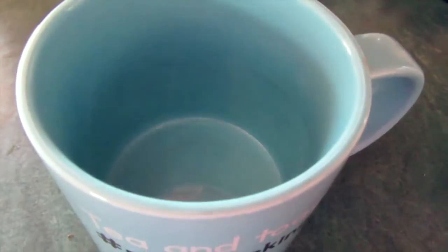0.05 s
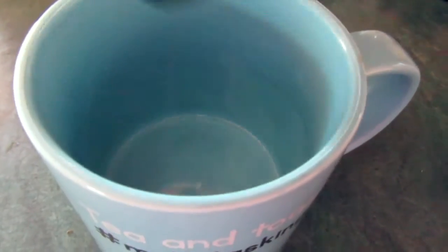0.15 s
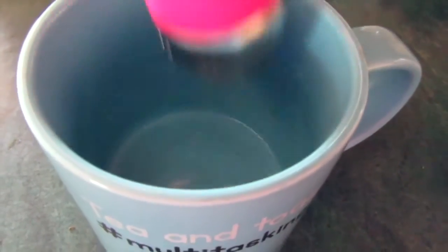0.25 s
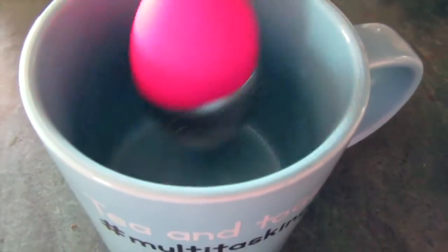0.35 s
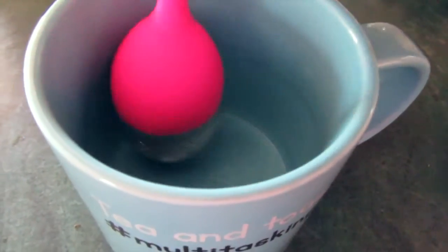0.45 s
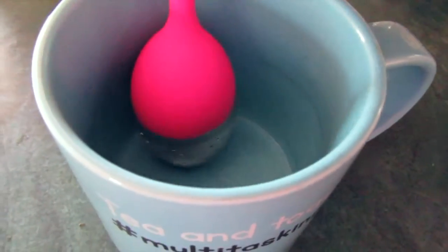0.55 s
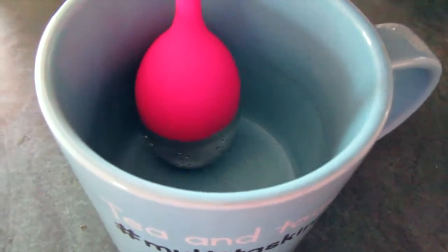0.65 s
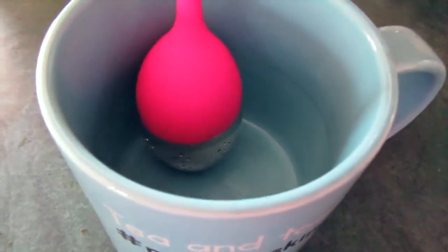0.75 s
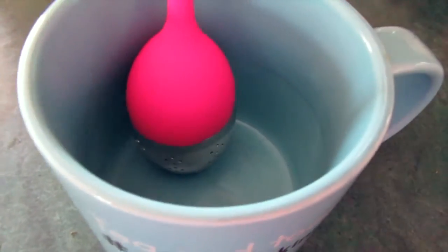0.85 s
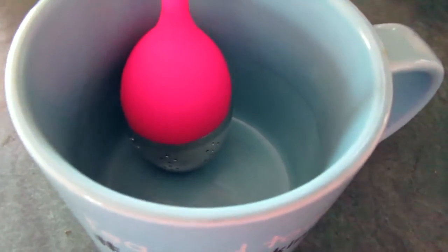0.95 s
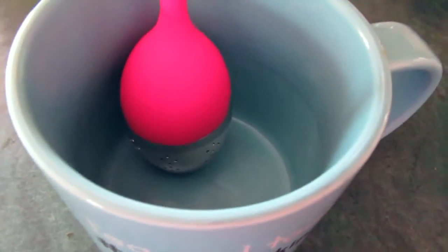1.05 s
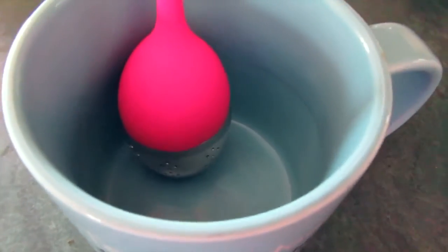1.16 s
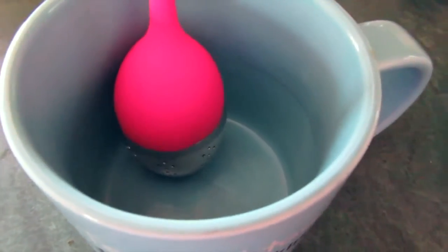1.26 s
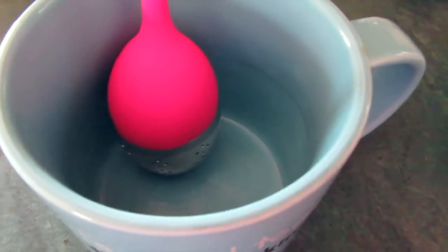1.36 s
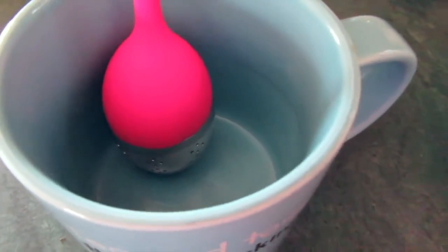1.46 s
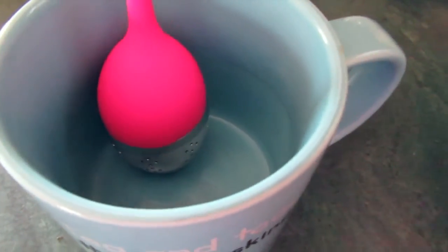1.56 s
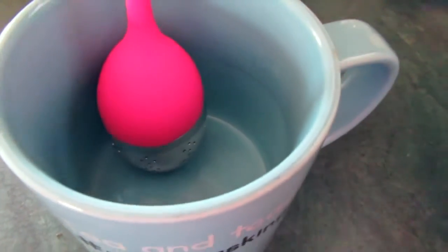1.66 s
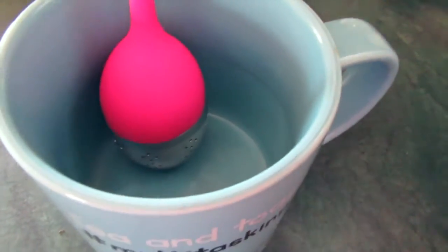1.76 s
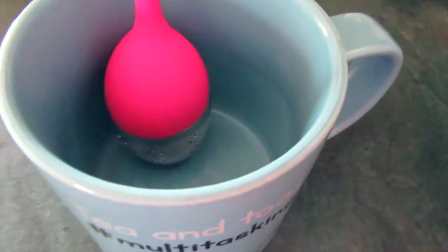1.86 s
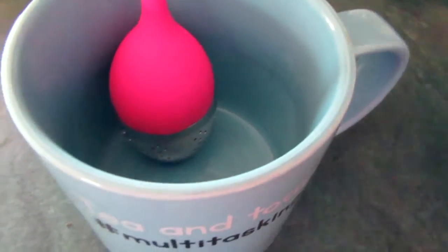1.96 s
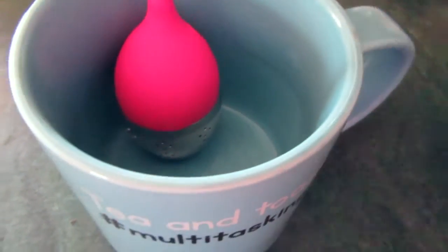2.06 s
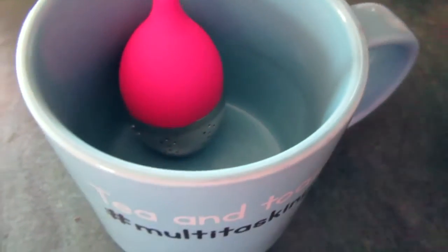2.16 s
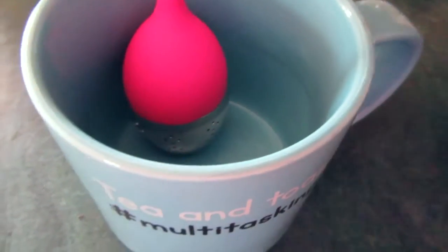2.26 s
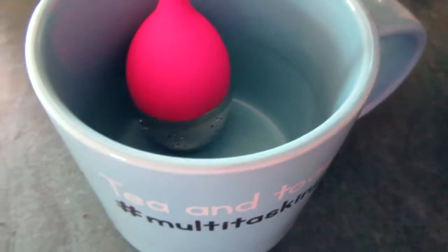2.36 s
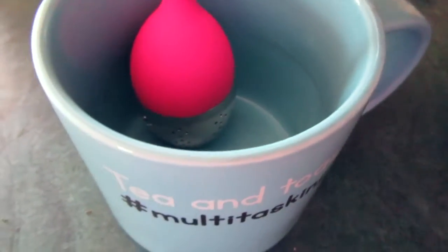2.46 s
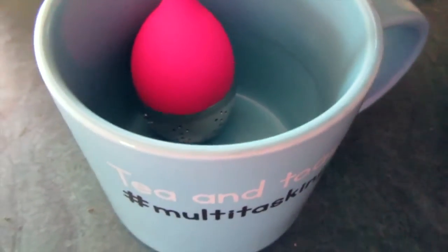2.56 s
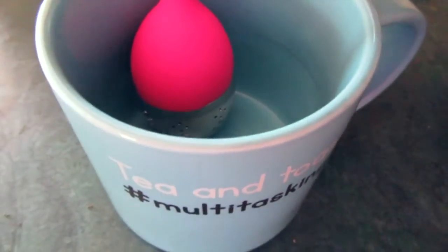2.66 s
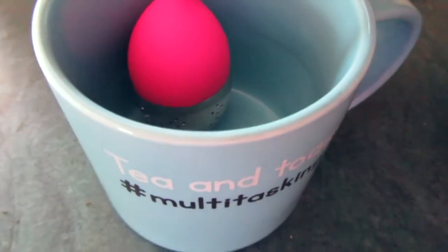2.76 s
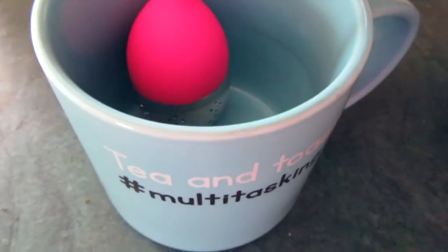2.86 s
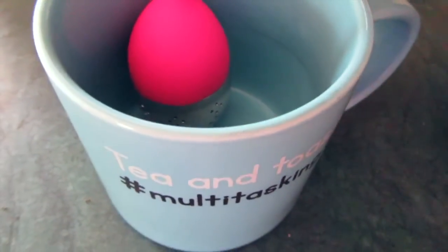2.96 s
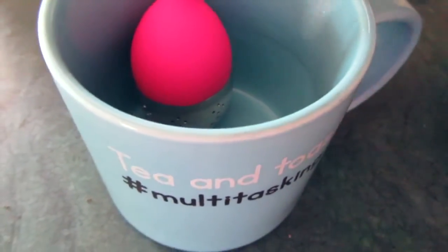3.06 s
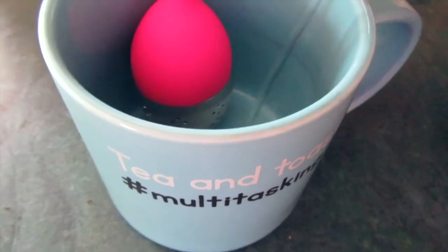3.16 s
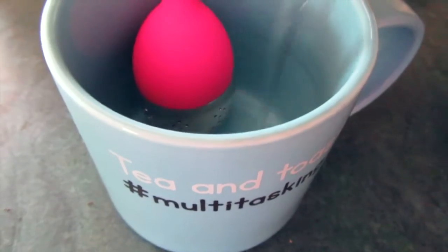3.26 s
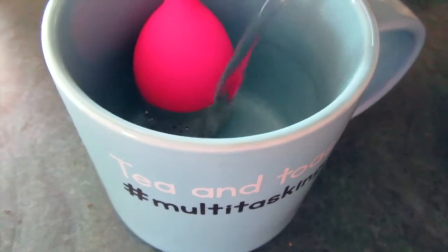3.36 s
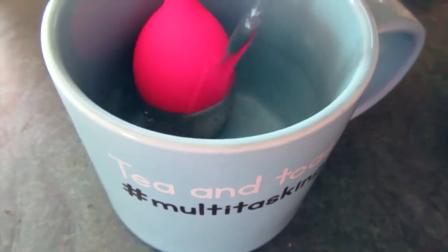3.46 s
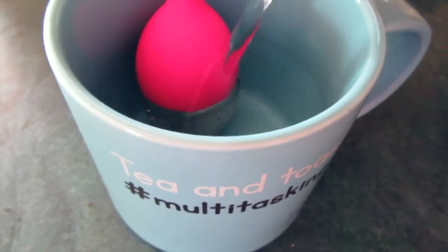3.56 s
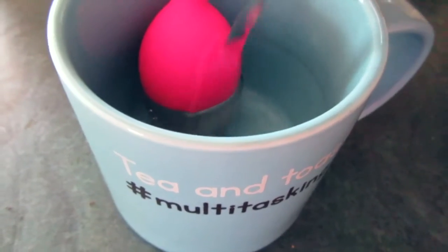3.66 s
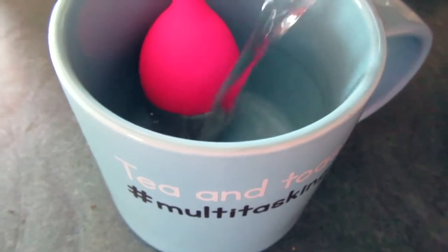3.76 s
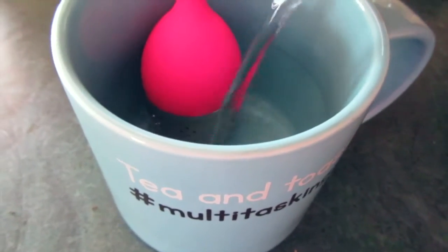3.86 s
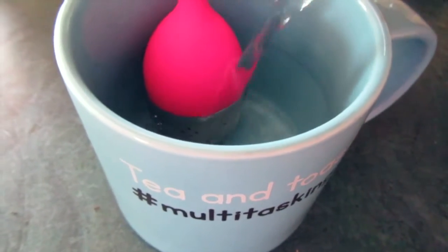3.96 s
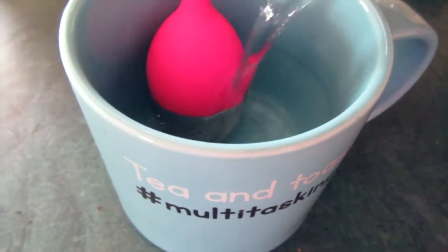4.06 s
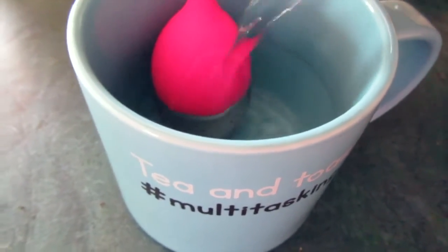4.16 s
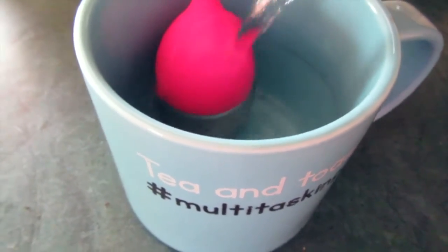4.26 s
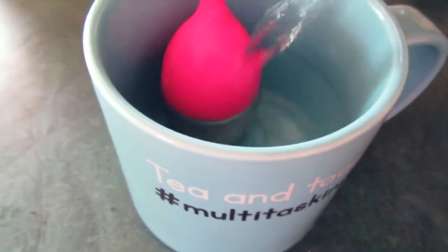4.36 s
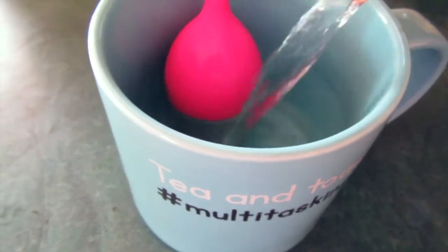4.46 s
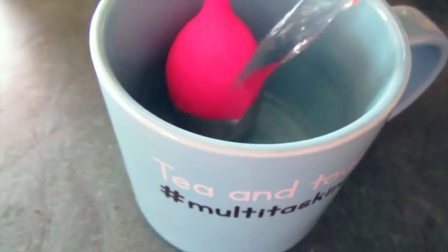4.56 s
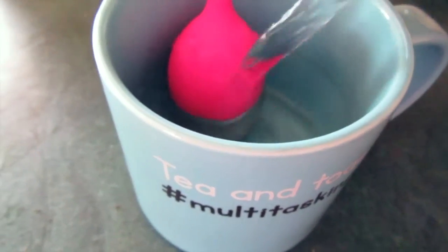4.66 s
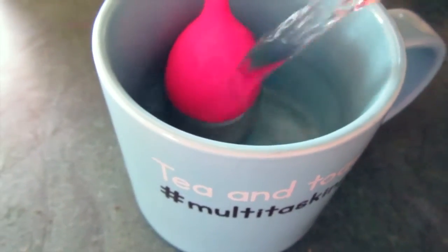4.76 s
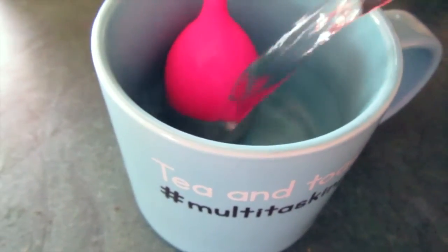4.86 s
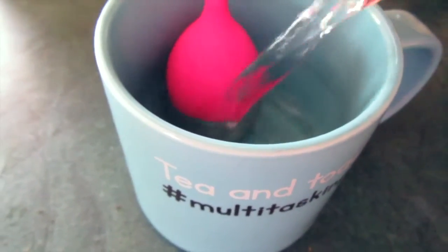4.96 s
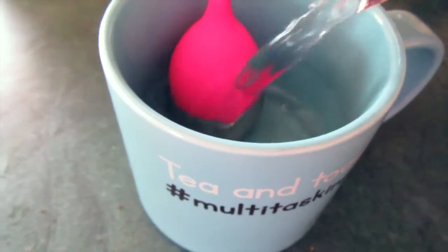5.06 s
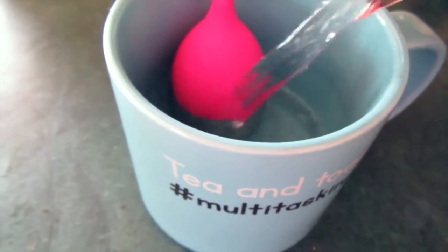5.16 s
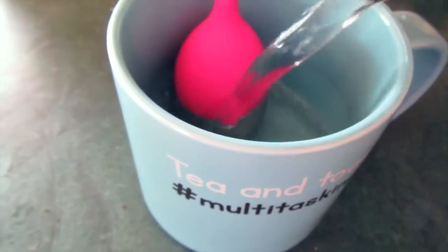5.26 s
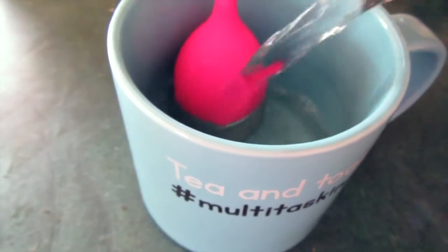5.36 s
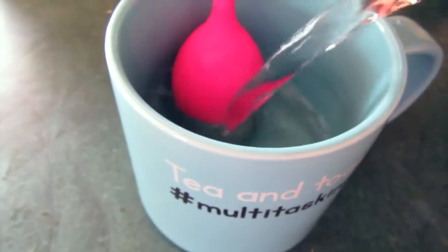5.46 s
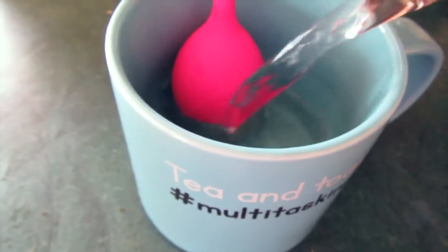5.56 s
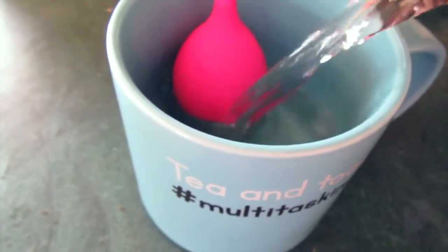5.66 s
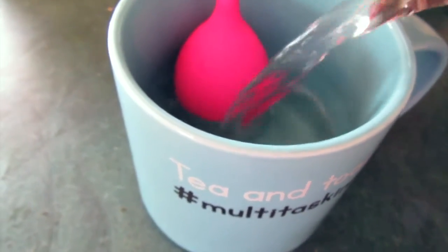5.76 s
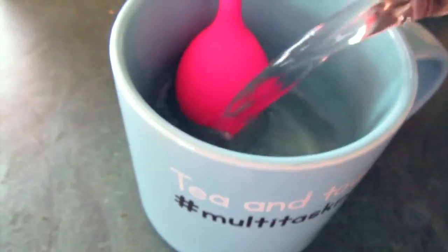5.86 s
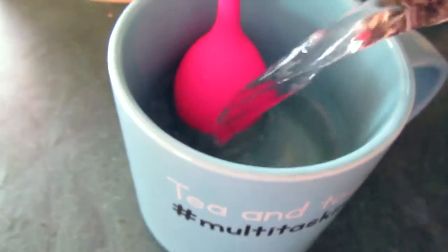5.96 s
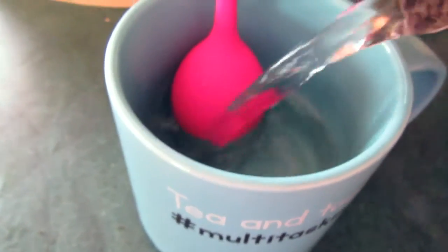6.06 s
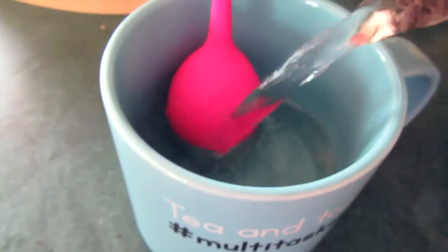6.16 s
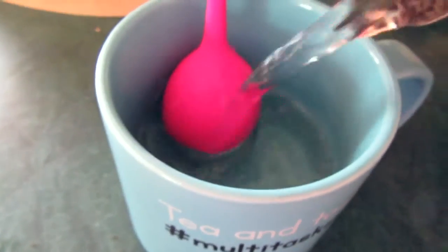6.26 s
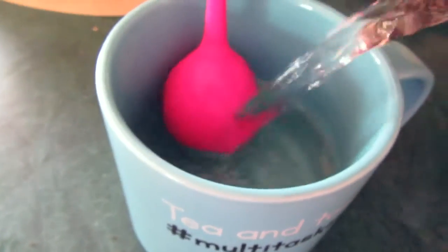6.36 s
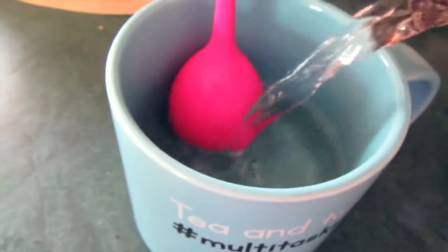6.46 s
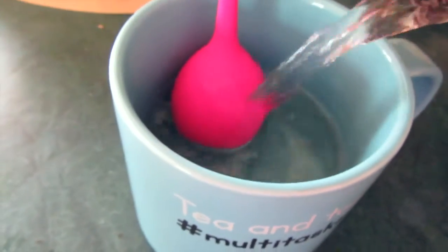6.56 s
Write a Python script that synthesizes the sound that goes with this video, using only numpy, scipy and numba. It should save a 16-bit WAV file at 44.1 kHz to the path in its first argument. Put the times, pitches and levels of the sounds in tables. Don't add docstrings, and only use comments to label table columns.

```python
import sys
import numpy as np
from scipy import signal
from scipy.fft import rfft, irfft
from scipy.io import wavfile
from scipy.ndimage import uniform_filter1d
from numba import njit

SR = 44100
rng = np.random.default_rng(int(sys.argv[2]) if len(sys.argv) > 2 else 0)


def output_pcm(signal):
    pcm = np.clip(np.atleast_2d(signal).T, -1, 1) * 32767
    wavfile.write(sys.argv[1], SR, np.round(pcm).astype(np.int16))


def field_ratio(decibels):
    return 10 ** (np.asarray(decibels, dtype=float) / 20)


N = 291501
T = np.arange(N) / SR

# (frequency [Hz], level per Hz [dB])
KITCHEN_TONE = [(18, -15.5), (36, 2), (47, -6), (100, -9.5), (250, -11.5), (450, -16.5), (800, -12),
                (1000, -16), (1200, -13.5), (1500, -21), (2200, -23.5), (5000, -29.5), (9500, -32),
                (14300, -41), (16000, -58)]
# (frequency [Hz], level [dB], time
# to fall 60 dB [s])
MUG_MODES = [(2497, 0, 1.05), (2735, -4.5, .76), (5346, -29, .47), (5561, -29, .36), (7003, -18, .2),
             (7607, -37, .35),
             (486, -21, 0.19), (860, -39.5, 1), (4300, -19, 0.075), (10555, -38, 0.35),
                   (11745, -26, .15), (12018, -39, .24), (12650, -38, .13), (13134, -42, .2),
                   (13265, -31, .14), (13597, -31, .11)]
# (time [s], width [s], share of the touch loss [1])
SHADE = [
    (.365, .06, .33),
    (.445, .018, -.2),
    (.5, .04, .3),
]
# (frequency [Hz], loss [dB])
TOUCH_LOSS = [(2500, -11), (2740, -.5), (5400, -6), (14000, -8)]
# (time [s], peak [dB], frequency [Hz], time to fall 60 dB [s])
KNOCKS = [(.2564, 5, 885, 0.017), (.2562, 12, 2900, 0.003), (.2563, -8, 6500, 0.012),
          (.4785, -17, 1490, 0.0081), (.487, -24, 950, 0.013), (.5887, -11, 1260, .011),
          (.505, -10, 1110, 0.003), (.507, -31, 475, 0.15), (.538, -24, 1170, 0.0044),
          (.5888, -6, 812, 0.036), (.506, -26, 760, .02), (1.887, -20.5, 1000, 0.0065),
          (1.922, -17.5, 1420, 0.0075), (2.045, -35, 2040, 0.025), (2.045, -28, 1300, 0.0097),
          (2.306, -12, 284.3, 0.15), (2.306, -17, 446, 0.07), (2.306, -18.5, 760, 0.037),
          (2.306, -22.5, 2150, 0.021), (2.368, -18, 277, 0.22), (2.372, -28, 1004, 0.033),
          (2.394, -19, 207, 0.033), (2.5642, -15.5, 2820, 0.013), (2.5578, -24, 2600, 0.01),
          (2.56, -36, 1270, .02), (2.716, -41, 2390, 0.018), (3.184, -26, 2320, 0.0068),
          (3.19, -36, 807, 0.045), (6.225, -33.5, 330, 0.04)]
# (time [s], peak [dB], frequency [Hz], time to fall 60 dB [s])
CLICKS = [(0.486, -44.5, 5870, 0.034), (0.2563, -13, 3800, 0.014), (3.742, -39, 7000, 0.22),
          (0.9613, -31, 5700, 0.0036), (1.1095, -36, 3300, 0.0075), (1.922, -30, 2600, 0.015),
          (1.8312, -38, 2930, 0.032), (1.923, -37, 5380, 0.029), (2.0027, -40, 3380, 0.024),
          (2.2128, -40, 6000, 0.015), (2.3065, -34, 3250, 0.01), (2.3416, -28, 3250, 0.0037),
          (2.5578, -32, 5000, 0.005), (2.5607, -26, 3000, 0.0057), (2.5642, -29.5, 4920, 0.024),
          (2.5807, -22, 4300, 0.0066), (2.5853, -32.5, 4500, 0.011), (2.7506, -36.5, 11700, 0.028)]
# (time
# [s], peak [dB], frequency [Hz], time to fall 60 dB [s])
GROANS = [(1.42, -22.5, 140.3, 0.33), (1.42, -31, 345, 0.42), (1.49, -37, 206, .7), (1.81, -37, 395, 0.28),
          (1.865, -32, 273.5, .3), (1.9, -38, 446.5, 0.31), (2.36, -27.5, 184, 0.29),
          (2.445, -24, 285, .17), (.5, -36.5, 130.5, .6), (.63, -35, 800, .37), (.74, -45, 805, .3)]
# (time [s], peak [dB], frequency [Hz], time to fall 60 dB [s])
TICKS = [(.5888, -54, 7540, .2), (.5888, -59, 5340, 0.45), (.5888, -64, 12100, 0.13), (2.75, -61, 7000, .6),
         (3.184, -40.5, 7520, 0.12), (3.184, -52, 12250, .1), (3.184, -54, 11750, .12),
         (3.475, -27.5, 7120, 0.054), (3.475, -43, 12200, .09), (3.475, -46, 10300, .09),
         (3.475, -54, 5560, 0.2), (3.74, -51, 5560, .7), (3.97, -54, 5600, 0.27), (3.842, -52, 10800, 0.23),
         (3.842, -46, 11700, 0.11), (4.04, -47, 6920, 0.067), (4.04, -48, 10800, 0.074),
         (3.84, -48, 7000, .1), (4.095, -56, 7100, .1), (4.21, -51, 5600, 0.14), (4.345, -35, 7060, 0.15)]
# (frequency [Hz], width [Hz], level [dB])
COUNTER = [(673, 28, 3.5), (1000, 79, -4), (1406, 68, -0.5), (2130, 37, -10)]
# (time [s], rumble level [dB], dryness [dB], rise [s], fall [s])
SCUFFS = [
    (1.115, -53, 2.5, 0.013, 0.28),
    (1.2, -50.5, -4, 0.035, 0.018),
    (1.301, -51.5, 2, 0.0077, .12),
    (1.72, -54.5, -7, 0.67, 0.28),
    (1.9, -45.5, -29, 0.098, 0.12),
    (2.0, -56.5, -5, 0.27, 0.38),
    (2.309, -20.5, -13, 0.0022, 0.011),
    (2.369, -38.5, -1.5, 0.021, 0.026),
    (2.44, -44, -6.5, 0.12, 0.045),
]
# (time [s], level [dB])
DRAG = [
    (1.275, -69),
    (1.289, -34.5),
    (1.309, -45.5),
    (1.365, -34),
    (1.377, -24),
    (1.395, -25),
    (1.441, -20),
    (1.471, -41.5),
    (1.62, -56),
]
# (time [s], peak [dB], frequency [Hz])
DRIPS = [(3.4739, -26.5, 7550), (3.4749, -33.5, 1350), (3.74, -27, 4300), (3.7401, -14.5, 6500),
         (3.735, -31, 2600), (3.949, -33, 10500), (3.928, -36, 7000), (3.7396, -24, 1280),
         (3.842, -28, 11100), (3.9115, -31, 2500), (3.9092, -21.5, 1675), (3.933, -32.5, 4340),
         (3.938, -31, 866), (3.9555, -38, 980), (3.9562, -20.5, 6540), (3.969, -42, 3300),
         (3.976, -36.5, 4500), (4.211, -34.5, 1040), (4.13, -32, 6760), (4.2099, -26.5, 5670),
         (4.2424, -24, 6750), (4.2446, -26, 3620), (4.2817, -30.5, 3500), (4.2823, -22, 5230)]
# (lowest [Hz], highest [Hz])
BEAD_HZ = (2000, 4000)
# (time [s], peak [dB], frequency [Hz])
SPRAY = [(4.2046, -38, 5500), (4.2353, -41, 7700), (4.2594, -34.5, 5800), (4.3088, -40.0, 9680),
         (4.3197, -40, 6200), (4.3329, -40, 7200), (4.3411, -40.5, 6860), (4.3507, -25.5, 6200),
         (4.3683, -42, 6140), (4.3803, -37, 5585), (4.384, -38.5, 8500), (4.3959, -39, 6960),
         (4.4247, -27, 7200), (4.4497, -27, 7540), (4.4724, -29, 9210), (4.4774, -34, 7870),
         (4.4919, -28, 6070), (4.5011, -33.0, 8300), (4.511, -31, 7310), (4.5286, -33, 5870),
         (4.5399, -28.5, 5660), (4.5563, -28, 10610), (4.5714, -40, 5340), (4.592, -34, 7570),
         (4.5996, -26.5, 7150), (4.6142, -36, 8260), (4.6205, -24.5, 8840), (4.6256, -34, 10000),
         (4.6296, -34, 6160), (4.6509, -40, 8840), (4.6932, -26, 10370), (4.7027, -25.5, 6160),
         (4.7236, -26, 8850), (4.731, -20.5, 6800), (4.739, -31, 6650), (4.7601, -38, 8390),
         (4.7687, -30, 9400), (4.7792, -37, 6650), (4.7831, -29, 8790), (4.8088, -37, 9240),
         (4.8151, -26, 8140), (4.8236, -28, 6470), (4.8359, -37, 7740), (4.851, -27.5, 7700),
         (4.8559, -41, 7110), (4.8646, -39.0, 10410), (4.8756, -29.5, 7140), (4.8863, -41, 7240),
         (4.9, -42, 7230), (4.9084, -38, 6830), (4.9127, -42, 6490), (4.9593, -31, 10300),
         (4.9709, -33.5, 9240), (4.998, -38, 7810),
         (5.0041, -44, 8390), (5.0932, -36.5, 4540), (5.1052, -39, 7550), (5.116, -41.0, 5100),
              (5.1325, -33, 4500), (5.1363, -37, 9410), (5.1945, -39.0, 4380), (5.2606, -36, 9650),
              (5.288, -33, 11220), (5.4116, -39, 5290), (5.439, -34, 4800), (5.4503, -31.5, 5100),
              (5.3782, -35, 4200), (5.46, -35, 5000), (5.4687, -32.5, 4930), (5.4802, -22.5, 9490),
              (5.4884, -32, 10300), (5.4953, -36, 10220), (5.5857, -39.5, 11220), (5.6016, -41, 7960),
              (5.6556, -41.5, 8800), (5.7096, -37.0, 4960), (5.7241, -38.0, 9700), (5.736, -34, 5800),
              (5.7473, -31.0, 7600), (5.751, -45, 5900), (5.7567, -38.5, 7560), (5.7698, -40.0, 7790),
              (5.7751, -37, 9100), (5.877, -38, 7150), (6.1253, -33, 8270), (6.183, -37, 11000),
              (5.223, -39, 4400), (6.2392, -34, 5700), (6.2474, -33.0, 5340), (6.3451, -35.5, 9600),
              (6.3594, -39.5, 5260), (6.3771, -39, 5920), (6.3917, -31.5, 9700), (6.401, -43, 6890),
              (6.5073, -39.5, 6200), (6.5846, -44, 5540), (6.589, -33.5, 6310), (6.5947, -41.0, 4720)]
# (time [s], peak [dB], frequency [Hz])
BUBBLES = [(4.3245, -24.5, 1460), (5.1325, -20, 1500), (4.4308, -18.5, 975), (4.4917, -18, 1025),
           (4.53, -25, 1610), (4.5708, -20, 1880), (4.6391, -18.5, 1070), (4.6912, -17.5, 1770),
           (4.7029, -17, 1210), (4.737, -19, 1260), (4.7676, -22, 920), (4.8238, -9.5, 1120),
           (4.8355, -25, 1115), (4.8862, -15.5, 1420), (4.9186, -21, 1410), (5.0478, -25, 1520),
           (5.136, -7.5, 1153), (5.462, -10.5, 1180), (5.4842, -15.5, 1216), (5.7093, -12.5, 1300),
           (5.7346, -16, 1200), (5.7483, -13, 1250), (5.8723, -14.5, 1180), (5.9064, -17, 1800),
           (6.011, -14.5, 1330), (6.1263, -21.5, 1270), (6.2213, -16.5, 1500), (6.475, -21, 1780),
           (6.506, -13, 1463), (6.552, -23, 1280)]
# (time [s], peak [dB], frequency [Hz])
FAINT_BUBBLES = [(4.2555, -32.5, 1060), (4.6143, -34, 1081), (4.7314, -35.0, 1070), (4.739, -23, 1180),
                 (4.8596, -25, 1130), (4.8721, -33.0, 1130), (4.9388, -35, 1210), (4.959, -38, 1290),
                 (5.1566, -27.5, 1150), (5.2039, -31, 1070), (5.2219, -35, 1000), (5.2714, -29, 1160),
                 (5.467, -21, 850), (5.5881, -34, 1100), (5.697, -28, 1500), (5.7572, -31, 1200),
                 (5.7679, -39, 1400), (5.774, -42, 1380), (5.7969, -30.5, 1080), (5.848, -37.0, 1160),
                 (5.9837, -33, 1130), (6.0017, -37.0, 1620), (6.0297, -25, 1260), (6.0941, -30, 1450),
                 (6.1259, -25, 1280), (6.3671, -29, 1470), (6.4769, -27, 1640), (6.5204, -39, 1660),
                 (6.5301, -24, 1410), (6.5503, -27.0, 1317)]
# (time [s], peak [dB])
GULPS = [(4.2351, -28), (4.5496, -22.5), (4.5626, -21.5), (4.63, -21.5), (4.7607, -22), (4.816, -22),
         (4.8507, -21), (4.893, -24), (4.908, -21), (4.946, -26), (5.0661, -19.5), (5.1479, -23),
         (5.194, -22.5), (5.26, -20), (5.327, -36), (5.378, -23.5), (5.4425, -21), (5.537, -33),
         (5.6466, -16.5), (5.674, -20), (5.7245, -23), (5.821, -22.5), (5.9606, -21), (6.029, -20),
         (6.2722, -21.5), (6.314, -17), (6.4023, -18), (6.4237, -24.5), (6.5226, -24), (6.5817, -17.5)]
# (time [s], peak [dB], frequency [Hz])
BEADS = [(4.3563, -25, 3310), (4.369, -28, 2190), (4.38, -24, 3250), (4.4247, -4.5, 3150),
         (4.4926, -14.5, 2230), (4.631, -27, 2540), (4.6916, -27, 3280), (4.7034, -21, 2650),
         (4.822, -29.5, 3030), (4.8895, -24, 3100), (4.9127, -33, 3120), (5.003, -32, 2280),
         (5.0795, -26, 2970), (5.196, -24.5, 3660), (5.2607, -28, 3270), (5.3238, -25.5, 3430),
         (5.3784, -24, 2450), (5.4286, -27, 2800), (5.4612, -30, 2690), (5.5595, -27, 3700),
         (5.5884, -25, 2870), (5.7327, -28, 2570), (5.8892, -24, 2820), (6.0023, -27, 3370),
         (6.218, -21.5, 3230), (6.2391, -32, 3940), (6.3772, -24, 4060), (6.401, -22.5, 3270),
         (5.646, -31, 2300)]
# (time [s], peak [dB], frequency [Hz])
FAINT_BEADS = [(4.2593, -32, 3200), (4.3286, -34, 3510), (4.3458, -32, 3250), (4.4662, -35, 3220),
               (4.5285, -25, 4300), (4.5626, -31, 2800), (4.6253, -34, 3100), (4.6398, -34, 2550),
               (4.6604, -34, 2900), (4.7309, -39, 3360), (4.7386, -39, 3300), (4.7852, -32.5, 2820),
               (4.8133, -28, 3250), (4.8746, -35, 3750), (4.9437, -34, 3220), (4.959, -33, 2758),
               (5.0021, -34.0, 3250), (5.0413, -38, 3050), (5.3591, -34, 3150), (5.4116, -35, 3300),
               (5.4416, -31, 2690), (5.4671, -30.5, 3700), (5.4841, -35, 2860), (5.9133, -33.5, 2600),
               (6.2466, -35, 3380), (6.441, -37.5, 3370), (6.4766, -39, 3400), (5.204, -32, 2500),
               (6.5502, -35.5, 2110), (6.5946, -38.5, 3750)]
# (time [s], level [dB])
FLOW = [
    (4.18, -54),
    (4.3, -44),
    (4.6, -40.5),
    (4.9, -40),
    (5.3, -38),
    (5.6, -40.5),
    (5.75, -38.5),
    (6.1, -40.5),
    (6.61, -35),
]
# (frequency [Hz], width [Hz], level [dB])
WET_MUG = [(2440, 45, 4.5), (3200, 95, 2), (3420, 170, -1.5), (4400, 260, 1), (5900, 400, -9),
           (7200, 200, -8), (7650, 160, -14)]
# (frequency [Hz], width [Hz])
DIPS = [(2310, 90), (2890, 260), (6700, 600)]

STRIKE_S = .2563
FILL = np.clip((T - 4.6) / 2, 0, 1)


def curve(rows, col, off=-120):
    rows = np.array(rows, float)
    return np.interp(T, rows[:, 0], rows[:, col], left=off, right=off)


def unit(x):
    return x / np.sqrt(np.mean(x ** 2))


def highpass(x, hz):
    return signal.sosfilt(signal.butter(2, hz, "high", fs=SR, output="sos"), x)


@njit
def svf(x, hz, width):
    y, band_state, low_state = np.empty(len(x)), 0., 0.
    for i in range(len(x)):
        g, k = np.tan(np.pi * hz[i] / SR), width / hz[i]
        v = (band_state + g * (x[i] - low_state)) / (1 + g * (g + k))
        band_state = 2 * v - band_state
        low_state = low_state + 2 * g * v
        y[i] = k * v
    return y


def band(x, hz, width):
    return svf(x, np.full(N, 1. * hz), 1. * width)


def rings(rows, glide=0., rough=0., rise=0.000067, size=2048):
    s, db, hz, t60 = np.array(rows, float).T[:, :, None]
    t60 = np.clip(t60, .002, size / SR)
    t = np.arange(size) / SR
    wander = rough * np.cumsum(rng.standard_normal((len(s), size)), axis=1)
    wave = np.sin(2 * np.pi * hz * t * (1 + glide * np.minimum(t / t60, 1)) + wander)
    wave = wave * field_ratio(db - 60 * t / t60) * (1 - np.exp(-t / rise))
    at = (s * SR).astype(int) + np.arange(size)
    return np.bincount(at.ravel(), wave.ravel(), N + size)[:N]


def walk(rate):
    k = int(SR / rate)
    held = np.repeat(rng.standard_normal(N // k + 1), k)
    return 2.42 * uniform_filter1d(uniform_filter1d(held, k), k)[:N]


def phone_gain_db():
    rest_db, duck_db, creep_s = 2.5, -9.5, 0.71
    pour_duck_db, pour_peak_s, pour_span_s = -3, 11, 0.6
    duck = (T > STRIKE_S) * np.exp(-np.maximum(T - STRIKE_S, 0) / creep_s)
    sag = np.exp(-((T - pour_peak_s) / pour_span_s) ** 2)
    return rest_db + duck_db * duck + pour_duck_db * sag


def fridge():
    hum_db, off_s, fade_db_per_s = -53, 2.2, 130
    phase = 2 * np.pi * 88 * T + 1.2 * walk(6)
    hum = unit(np.sin(phase) * field_ratio(.8 * walk(9)))
    fade_db = fade_db_per_s * np.maximum(T - off_s, 0)
    return hum * field_ratio(hum_db - 3.5 + phone_gain_db() - fade_db)


def kitchen():
    hz, db = np.transpose(KITCHEN_TONE)
    f = np.arange(N // 2 + 1) * SR / N + 1
    air = irfft(rfft(rng.standard_normal(N)) * field_ratio(np.interp(np.log(f), np.log(hz), db)), N)
    air_db = -52 + 0.63 * walk(2.435) + phone_gain_db()
    return unit(air) * field_ratio(air_db) + fridge()


def struck_wall():
    strike_db, touch_s, touch_len_s = -9.3, .455, .028
    early = T[:2 * SR]
    t = np.maximum(early - STRIKE_S, 0)
    touch = np.clip((early - touch_s) / touch_len_s, 0, 1)
    for s, width, share in SHADE:
        touch = touch + share * np.exp(-((early - s) / width) ** 2)
    wall = 0
    for hz, db, t60 in MUG_MODES:
        loss_db = np.interp(hz, *np.transpose(TOUCH_LOSS)) * touch
        level_db = strike_db + db - 60 * t / t60 + loss_db
        wall = wall + field_ratio(level_db) * np.sin(2 * np.pi * hz * t)
    return np.pad(wall, (0, N - len(t)))


def contacts():
    knocks = rings(KNOCKS, rough=0.035, rise=0.00049, size=8192)
    clicks = band(rings(CLICKS, rough=0.45, size=4096), 4700, 20000)
    groans = rings(GROANS, rough=0.012, rise=0.021, size=16384)
    ticks = rings(TICKS, rough=0.0027, size=16384)
    return knocks + clicks + groans + ticks


def scuffs(*db):
    s, _, _, rise, fall = np.transpose(SCUFFS)[:, :, None]
    t = T[:int(3 * SR)]
    shape = field_ratio(-20 * np.maximum((s - t) / rise, (t - s) / fall))
    return np.pad(field_ratio(np.array(db)) @ shape, [(0, 0), (0, N - len(t))])


def kettle():
    lift_s, dust_db, dust_fade_db_per_s = 1.434, -12.5, 350
    weight_share, weight_db, scuff_body_db = 0.71, -14, -18
    slips_db = .3 * walk(90)
    grit, dust = (rng.standard_normal(N) * field_ratio(slips_db + 1.93 * walk(500)) for _ in range(2))
    body = sum(field_ratio(db) * band(grit, hz, 3.5 * width) for hz, width, db in COUNTER)
    body = unit(band(body, 1160, 1370))
    hiss = unit(band(band(dust, 2500, 9700), 2500, 9700))
    rumble = unit(band(band(grit, 130, 300), 410, 490))
    drag_db = curve(DRAG, 1, off=-200)
    hiss_db = drag_db + dust_db - dust_fade_db_per_s * np.maximum(T - lift_s, 0)
    drag = field_ratio(np.array([drag_db + 2.2, hiss_db, weight_share * drag_db + weight_db]))
    _, scuff_db, dry_db, _, _ = np.transpose(SCUFFS)
    scuff = scuffs(scuff_db + scuff_body_db, scuff_db + dry_db, scuff_db)
    return ((drag + scuff) * [body, hiss, rumble]).sum(axis=0)


def drips(lo, hi):
    return [row for row in DRIPS if lo <= row[2] < hi]


def lifted(rows, db, fill_db):
    return [(s, level_db + db + fill_db * FILL[int(s * SR)], hz) for s, level_db, hz in rows]


def lasting(rows, cycles, fill_db=0.):
    rows = np.array(rows, float)
    fill = np.clip((rows[:, 0] - 4.5) / 2, 0, 1)
    varied_db = 1.6 * rng.standard_normal(len(rows))
    return np.c_[rows, cycles / rows[:, 2] * field_ratio(varied_db + fill_db * fill)]


def spray_bursts():
    drops = drips(BEAD_HZ[1], SR) + lifted(SPRAY, 4.85, 6.5)
    return rings(lasting(drops, 55.0, fill_db=-13.0), rough=0.56, rise=0.0001, size=1024) * field_ratio(4.5)


def large_bubbles(column_hz):
    snap_db, snap_hz, snap_t60_s = -19.5, 3800, 0.004
    gulps = [(s, db, column_hz[int(s * SR)]) for s, db in GULPS]
    large = drips(0, BEAD_HZ[0]) + BUBBLES + gulps + lifted(FAINT_BUBBLES, 3.4, 6.0)
    snaps = rings([(s, db + snap_db, snap_hz, snap_t60_s) for s, db, _ in large], rough=1.0, size=512)
    ringing = lasting(large, 21.8, fill_db=-9.5)
    return rings(ringing, glide=0.0043, rough=0.073, rise=0.00057) * field_ratio(4.5), snaps


def small_beads():
    drops = drips(*BEAD_HZ) + BEADS + lifted(FAINT_BEADS, 3.0, 2.5)
    return rings(lasting(drops, 33.0, fill_db=1.5), glide=0.12, rough=0.15, rise=0.00025) * field_ratio(5)


def crowd_db(x):
    reach_s, share = 0.018, 0.38
    power = uniform_filter1d(x ** 2, int(reach_s * SR))
    return share * 10 * np.log10(np.abs(power) / np.mean(power[T > FLOW[1][0]]) + 0.12)


def swarm(s, level_db, centre_hz, octaves, spread_db):
    at = np.minimum((s * SR).astype(int), N - 1)
    pitch_chance, level_chance = rng.standard_normal((len(s), 2)).T
    hz = np.clip(centre_hz[at] * 2 ** (octaves * pitch_chance), 400, 13000)
    return np.c_[s, level_db[at] + spread_db * level_chance, hz]


def wet_wall(strikes):
    return sum(field_ratio(db) * svf(strikes, hz + 330 * FILL ** 2, 1. * width) for hz, width, db in WET_MUG)


def mouth_dips(heard):
    for hz, width in DIPS:
        heard = heard - .8 * svf(heard, hz + 200 * FILL ** 2, 1. * width)
    return heard


def water(count=850):
    air_m, rise_m_per_s = 0.0823, 0.011
    bare_db, pool_db, pool_s, pool_len_s = 0.7, -13, 5.02, 0.044
    column_hz = 343 / 4 / (air_m - rise_m_per_s * np.maximum(T - FLOW[0][0], 0))
    spray = spray_bursts()
    bubbles, snaps = large_bubbles(column_hz)
    beads = small_beads()

    s = rng.uniform(FLOW[0][0], FLOW[-1][0], count)
    gurgle_db = curve(FLOW, 1) + 1.73 * walk(40) + crowd_db(bubbles)
    fizz_db = curve(FLOW, 1) + 1.73 * walk(40) + crowd_db(spray * field_ratio(8.3 * FILL))
    fizz_db = fizz_db + bare_db + pool_db / (1 + np.exp((pool_s - T) / pool_len_s))
    plop_drops = swarm(s, gurgle_db + 5, column_hz, 0.44, 3.0)
    plops = rings(lasting(plop_drops, 16.0), glide=0.42, rough=0.099, size=512)
    overtone_drops = swarm(s, gurgle_db - 5.0, column_hz + 1900, 0.36, 3.4)
    overtones = rings(lasting(overtone_drops, 19.0), rough=0.017, size=512)
    fizz_drops = swarm(s, fizz_db + 5.5, np.full(N, 6500.), 0.39, 4.0)
    fizz = rings(lasting(fizz_drops, 29.0), rough=0.92, size=512)
    hiss = highpass(spray + fizz + snaps, 3000)

    churn = rng.standard_normal(N) * field_ratio(gurgle_db - 15 + 6.5 * FILL + 1.9 * walk(200))
    slosh = band(churn, 440, 300) * field_ratio(10)
    column = svf(plops + 0.19 * bubbles + 2.5 * churn, column_hz, 540.0) * field_ratio(-2.5) + slosh
    strikes = hiss + 0.55 * beads + 0.83 * overtones + 2.2 * bubbles + 0.077 * plops
    strikes = (strikes + 2.1 * churn * field_ratio(-5.0 * FILL)) * field_ratio(-2.5 * FILL)
    heard = bubbles + beads + 0.56 * plops + column + 2.5 * overtones + hiss
    heard = heard + field_ratio(4.0) * wet_wall(strikes)
    return highpass(mouth_dips(heard), 420)


def room(x, t60=0.43, wet_db=-25):
    t = np.arange(int(.5 * SR)) / SR
    dull = signal.lfilter([.4], [1, -.6], rng.standard_normal(len(t)))
    tail = dull * field_ratio(-60 * t / t60) * (t > .004)
    tail = tail / np.sqrt(np.sum(tail ** 2))
    return x + field_ratio(wet_db) * signal.fftconvolve(np.clip(x, -.4, .4), tail)[:N]


def scene():
    tone = kitchen()
    small = highpass(struck_wall() + contacts() + water(), 170)
    return (room(small + kettle()) + tone)[None]


def band_limit(x):
    return signal.sosfilt(signal.butter(12, 16280, fs=SR, output="sos"), x)


def record(dry):
    top = signal.sosfilt(signal.ellip(6, .5, 50, 14800, fs=SR, output="sos"), dry)
    mix = np.clip(top, -1, 1)
    return band_limit(mix)


dry = scene()
out = record(dry)
output_pcm(out)
```